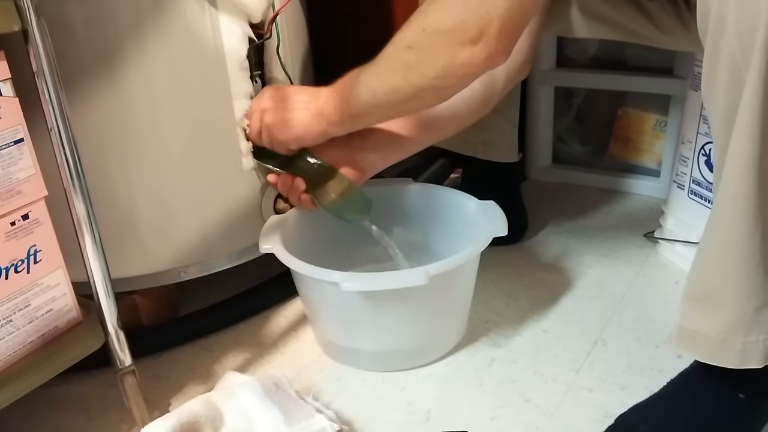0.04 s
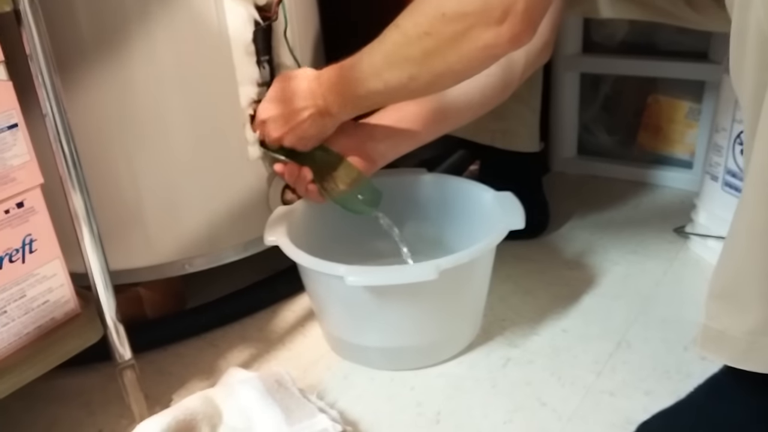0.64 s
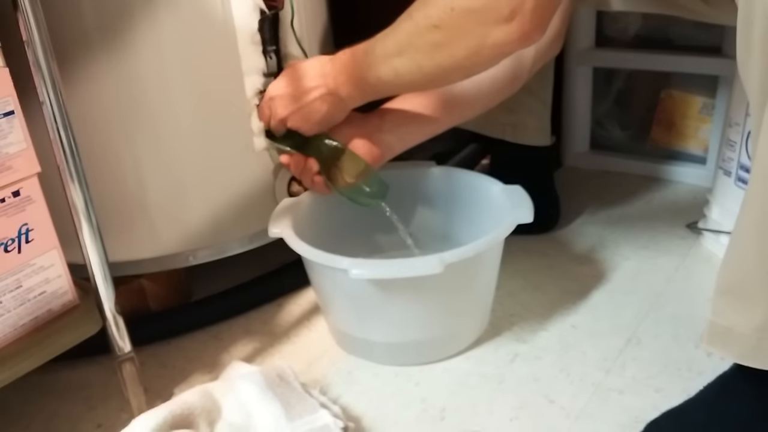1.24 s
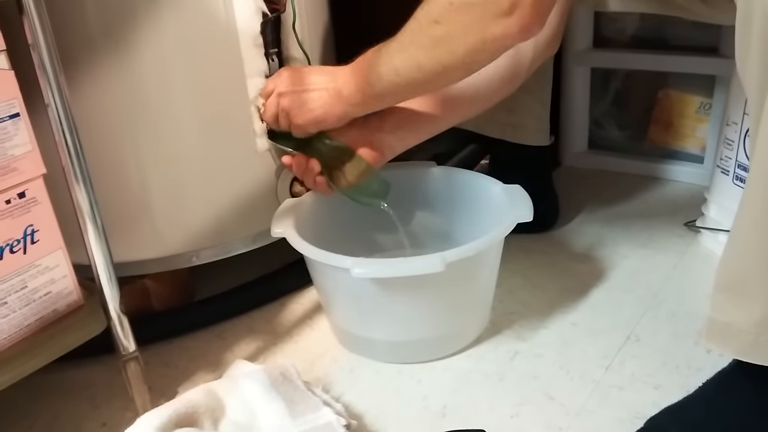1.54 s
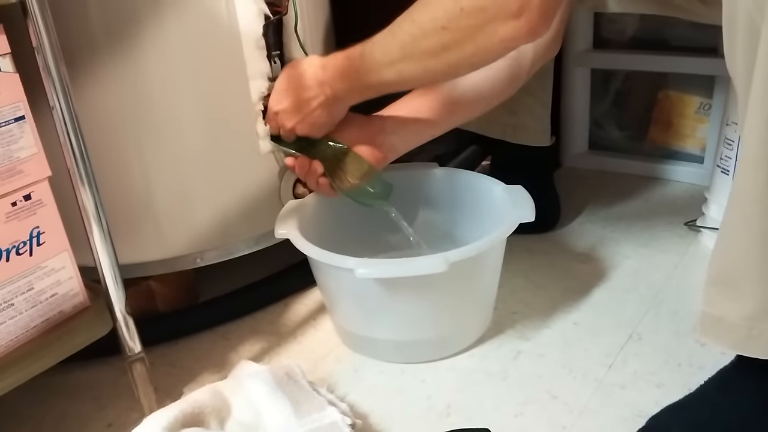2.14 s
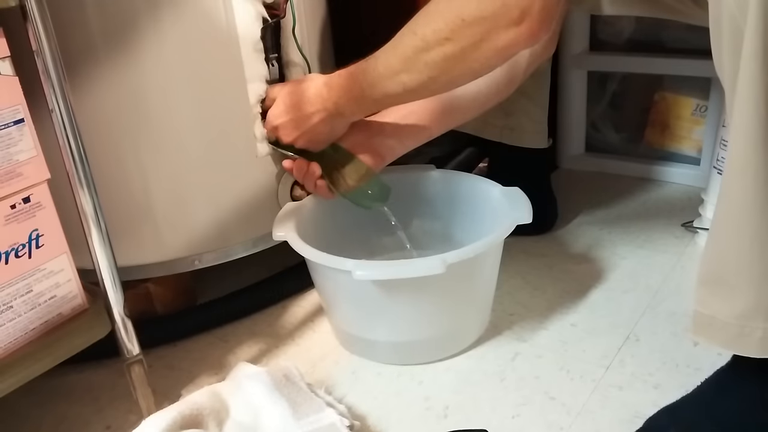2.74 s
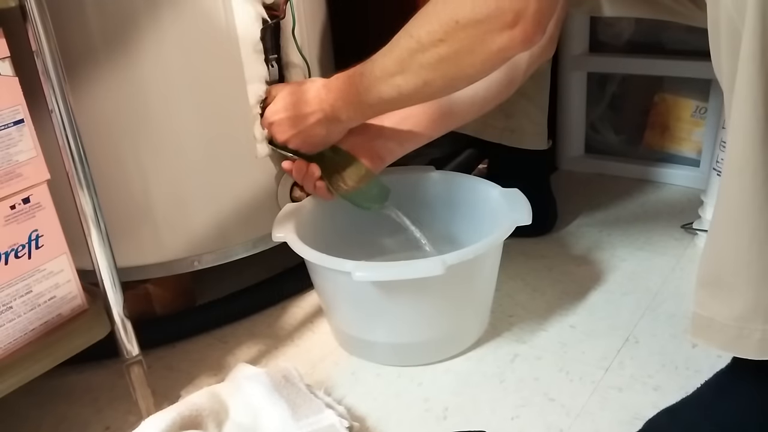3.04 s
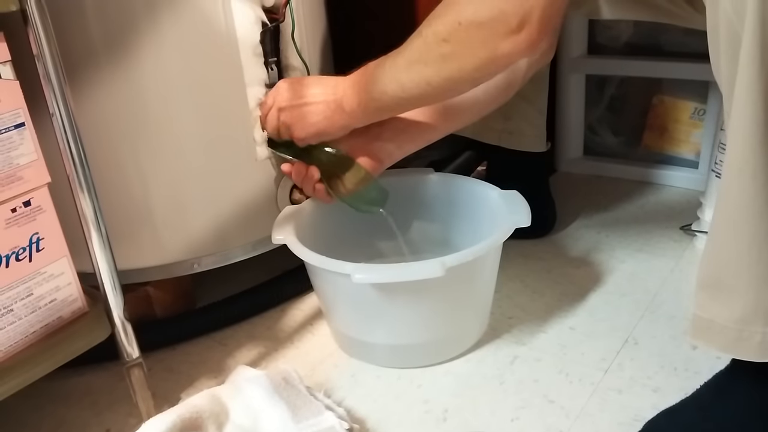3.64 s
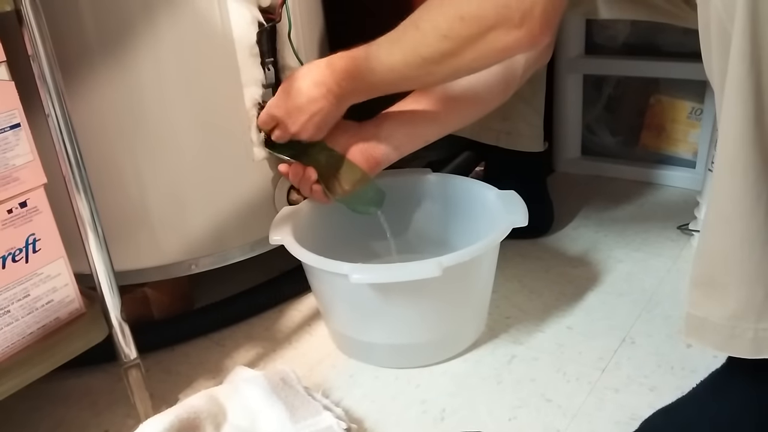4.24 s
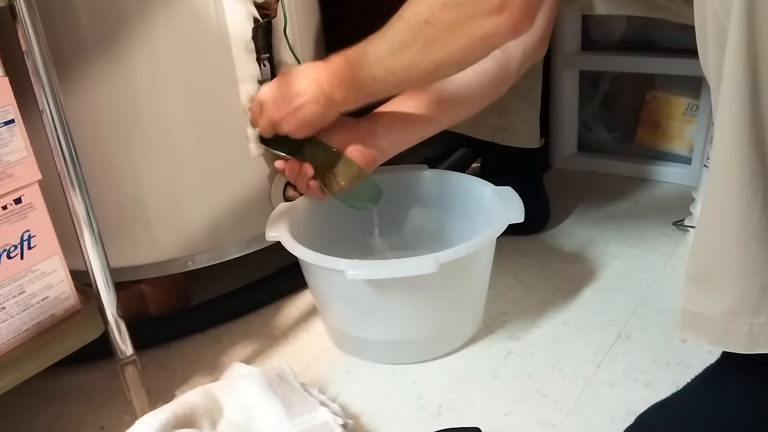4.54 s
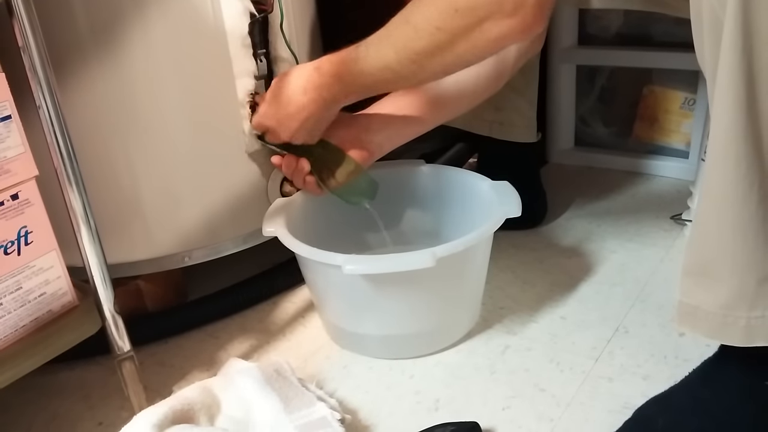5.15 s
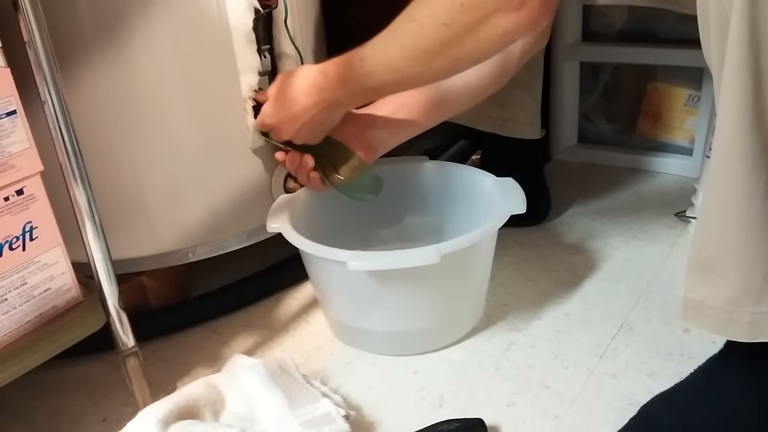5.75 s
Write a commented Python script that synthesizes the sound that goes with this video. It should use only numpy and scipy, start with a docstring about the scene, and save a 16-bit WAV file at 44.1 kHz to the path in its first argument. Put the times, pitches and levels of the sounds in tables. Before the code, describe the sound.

A thin, sputtering stream of water drains from a tank into a plastic bucket, splashing in the shallow water with bubbly plinks and small droplet ticks on the sides. The tank gulps air in hollow glugs at the start, twice in the middle and in a longer run near the end. A faint motor hum and low rumble continue underneath. The sound is fairly close, in a small room.

```python
"""Hollow glugs and a thin, sputtering stream: hot water drains from a heater tank down a plastic
chute into a plastic bucket. The jet slaps and churns the shallow water, drops splash, trapped bubbles
plink and droplets tick on the dry wall. Now and then the tank gulps air again and rings.
Underneath, a motor hums and rumbles in the small utility room."""
import sys
import numpy as np
from scipy import signal
from scipy.fft import rfft, irfft
from scipy.io import wavfile
from scipy.ndimage import uniform_filter1d

SR = 44100
rng = np.random.default_rng(int(sys.argv[2]) if len(sys.argv) > 2 else 0)


def inscribe(sig):
    """Save sig as 16-bit PCM at rate SR to the path in sys.argv[1].

    A 1-D sig is mono; a 2-D sig holds one channel per row.
    Samples are clipped to [-1, 1] before scaling.
    """
    pcm = np.round(np.clip(np.atleast_2d(sig).T, -1, 1) * 32767)
    wavfile.write(sys.argv[1], SR, pcm.astype(np.int16))


N = 264864
TIME_S = np.arange(N) / SR
AGE_S = TIME_S[:SR // 8]   # time within one event


def from_db(db):
    """Decibels to gain."""
    return 10 ** (np.asarray(db) / 20)


def rms_one(x):
    """Scale to rms 1."""
    return x / np.sqrt(np.mean(x ** 2) + 1e-20)


def peak_one(x):
    """Scale a stereo event to rms 1 over its loudest 4 ms."""
    return x / np.sqrt(uniform_filter1d(np.mean(x ** 2, axis=0), size=176).max() + 1e-20)


def levelled(x, size):
    """Hold stereo rms at 1 over a sliding window of size samples."""
    return x / np.sqrt(uniform_filter1d(np.mean(x ** 2, axis=0), size=size) + 1e-12)


def at_hz(table, hz):
    """Interpolate a table on a log-frequency axis."""
    knots_hz, values = np.transpose(table)
    return np.interp(np.log(hz + 1e-9), np.log(knots_hz), values)


def at_time(table, time_s):
    """Interpolate each value column of a table in time."""
    knots_s, *columns = np.transpose(table)
    return [np.interp(time_s, knots_s, column) for column in columns]


def decay(t60_s, age_s=AGE_S):
    """Exponential fall, 60 dB in t60_s."""
    return from_db(-60 * age_s / t60_s)


def attack(tau_s, age_s=AGE_S):
    """Exponential rise to 1."""
    return 1 - np.exp(-age_s / tau_s)


def pan(left_right_db):
    """Left and right gains, mean 1."""
    gains = from_db(left_right_db * np.array([[1], [-1]]) / 2)
    return gains / gains.mean(axis=0)


def add(out, start_s, sound):
    """Mix in a stereo event."""
    start = max(int(start_s * SR), 0)
    out[:, start:start + sound.shape[-1]] += sound[:, :N - start]


def drift(rate_hz):
    """Piecewise-linear random curve, rms 1."""
    knots = rng.standard_normal(int(rate_hz * N / SR) + 2)
    return rms_one(np.interp(TIME_S * rate_hz, np.arange(len(knots)), knots))


def stereo_noise(correlation, size):
    """White noise with a given left-right correlation."""
    mid, side = rng.standard_normal((2, size))
    return np.sqrt((1 + correlation) / 2) * mid + np.sqrt((1 - correlation) / 2) * side * [[1], [-1]]


def bandpass(x, low_hz, high_hz):
    """Butterworth band-pass."""
    return signal.sosfilt(signal.butter(2, [low_hz, high_hz], "band", fs=SR, output="sos"), x)


def resonate(x, hz, width_hz):
    """Two-pole resonator, peak gain 1."""
    radius = np.exp(-np.pi * width_hz / SR)
    numerator = np.array([1, 0, -1]) * (1 - radius ** 2) / 2
    denominator = [1, -2 * radius * np.cos(2 * np.pi * hz / SR), radius ** 2]
    return signal.lfilter(numerator, denominator, x + 1e-18)


# Stereo balance: (frequency [Hz], left-right [dB])
BALANCE = [(60, -5.5), (200, -6.5), (370, -11), (700, 0.5), (1300, -5.5), (2400, -2), (4400, -5),
           (8000, -8.5), (11000, 2), (15000, -0.5)]


def coloured(x, spectrum, size=8192):
    """Minimum-phase filter following a spectrum and the stereo balance."""
    hz = np.arange(size // 2 + 1) * SR / size
    magnitude = from_db(at_hz(spectrum, hz)) * pan(at_hz(BALANCE, hz))
    cepstrum = irfft(np.log(magnitude))
    cepstrum[:, 1:size // 2] *= 2
    response = irfft(np.exp(rfft(cepstrum[:, :size // 2], size)))
    return signal.fftconvolve(x, response, axes=-1)[:, :x.shape[-1]]


# Room decay: (frequency [Hz], T60 [s])
ROOM_DECAY = [(300, 1), (550, 0.43), (1000, 0.3), (3000, 0.36), (7000, 0.06), (14000, 0.53)]


def room(x, wet_db, size=12000):
    """Direct sound plus a diffuse tail with one decay time per band."""
    age_s, tail = TIME_S[:size], 0
    edges_hz = np.geomspace(200, 16000, 8)
    for low_hz, high_hz in zip(edges_hz, edges_hz[1:]):
        band = bandpass(stereo_noise(0.035, size), low_hz, high_hz)
        tail = tail + band * decay(at_hz(ROOM_DECAY, np.sqrt(low_hz * high_hz)), age_s)
    tail = rms_one(tail * attack(0.0035, age_s)) / np.sqrt(size)
    return x + from_db(wet_db) * signal.fftconvolve(x, tail, axes=-1)[:, :N]


# Room air: (frequency [Hz], level [dB])
AIR_SPECTRUM = [(100, -14), (330, 2.5), (560, -15), (900, 1), (2000, -31), (4000, -26), (7000, -19),
                (11000, -26), (16000, -31)]


def room_air(rms_db):
    """Faint, steady background noise."""
    return from_db(rms_db) * rms_one(coloured(stereo_noise(0.45, N), AIR_SPECTRUM))


# Hum lines: (frequency [Hz])
HUM_LINES_HZ = [59.4, 120.1, 175.0, 295.0, 350.6]
# Per hum line: (level [dB], left-right [dB])
HUM_LEVELS = [(-52, 5), (-38.5, -7), (-50.5, -4.5), (-64.5, -10), (-54.5, -10)]
# Rumble envelope: (time [s], level [dB])
RUMBLE_ENVELOPE = [(0.0, -46), (0.24, -35.5), (0.6, -33), (0.78, -45), (1.0, -28.5), (1.3, -34),
                   (1.47, -29), (1.77, -39), (1.96, -25), (2.06, -33.5), (2.3, -41.5), (2.42, -35.5),
                   (2.62, -39.5), (2.8, -34.5), (3.15, -39), (3.35, -33.5), (3.55, -40.5), (3.8, -30.5),
                   (4.1, -29), (4.72, -42), (4.82, -33), (5.0, -42.5), (5.22, -33.5), (5.45, -38.5),
                   (6.01, -33)]
# Rumble: (frequency [Hz], level [dB])
RUMBLE_SPECTRUM = [(10, -37), (21, -23), (32, -34), (47, -13.5), (58, 6), (68, -4), (79, 7.5), (98, -16.5),
                   (130, -23.5), (300, -62), (4000, -110)]
# Drone: (frequency [Hz], level [dB])
DRONE_SPECTRUM = [(60, -33), (100, -9), (122, -9), (140, -8), (172, -7.5), (195, -18.5), (245, -27),
                  (340, -22.5), (560, -36), (1200, -74.5), (4000, -110)]


def motor(rumble_db, drone_db, waver_db=1.4, hum_db_per_db=0.29, drone_db_per_db=0.56):
    """Near-steady hum lines and a rough drone, both swelling a little with a heaving rumble."""
    hum = 0
    for hz, (db, side_db) in zip(HUM_LINES_HZ, HUM_LEVELS):
        cycles = hz * TIME_S + rng.random() + 0.05 * drift(rate_hz=6)
        amplitude = np.sqrt(2) * from_db(db + waver_db * drift(rate_hz=8))
        hum = hum + pan(side_db) * amplitude * np.sin(2 * np.pi * cycles)
    level_db, = at_time(RUMBLE_ENVELOPE, TIME_S)
    heave_db = level_db - level_db.mean()
    rumble = levelled(coloured(stereo_noise(1.0, N), RUMBLE_SPECTRUM), size=5000)
    drone = levelled(coloured(stereo_noise(0.99, N), DRONE_SPECTRUM), size=9000)
    return (from_db(hum_db_per_db * heave_db) * hum
            + from_db(drone_db + drone_db_per_db * heave_db) * drone
            + from_db(level_db + rumble_db) * rumble)


def wall_echoes(sound, echo_db, t60_s, count=16):
    """Random reflections between container walls, different in each channel; output rms 1."""
    paths = np.zeros((2, SR // 32))
    for path in paths:
        lags = rng.integers(SR // 2500, SR // 40, count)
        path[lags] = from_db(echo_db) * rng.choice([-1, 1], count) * decay(t60_s)[lags]
        path[rng.integers(0, 12)] = 1   # direct path
    echoed = signal.fftconvolve(paths, np.atleast_2d(sound), axes=-1)
    return echoed / echoed.std(axis=-1, keepdims=True)


def bubble(age_s, hz, t60_cycles, swell_cycles, rise):
    """A bubble swells, rings down and rises in pitch as it nears the surface."""
    cycles = np.maximum(age_s, 0) * hz
    phase = 2 * np.pi * cycles * (1 + rise * (cycles / t60_cycles / 2 - 0.25))
    swell = (1 - np.exp(-cycles / swell_cycles)) ** 2
    return np.sin(phase) * from_db(-60 * cycles / t60_cycles) * swell


def bubble_cluster(hz, t60_cycles, swell_cycles, small_db, scatter_oct, delay_s, count=4, size=2200):
    """One main bubble, then a few weaker ones of nearby sizes."""
    lags_s = np.append(0, delay_s * rng.exponential(1, count))[:, None]
    pitches_hz = hz * np.append(1, 2 ** (scatter_oct * rng.uniform(-1.001, 1, count)))[:, None]
    gains = np.append(1, from_db(small_db) * rng.standard_normal(count))
    return gains @ bubble(AGE_S[:size] - lags_s, pitches_hz, t60_cycles, swell_cycles, rise=0.042)


# Air gulps: (time [s], level [dB], churn T60 [s], relative boom [dB], pitch [Hz], churn cutoff [Hz])
GULPS = [(0.002, -29.5, 0.047, -13, 1072, 1900), (0.044, -29, 0.04, -7, 806, 2100),
         (0.062, -18.5, 0.12, -29, 1017, 2630), (0.147, -23, 0.15, -7.5, 780, 2600),
         (1.549, -33, 0.15, -31, 737, 1690), (1.555, -24, 0.063, -31, 1340, 2210),
         (1.772, -31, 0.29, -13, 820, 1390), (2.086, -26.5, 0.11, -21, 1550, 2200),
         (2.091, -12.5, 0.099, -15.5, 1030, 3620), (2.099, -13, 0.1, -20, 924, 3050),
         (2.886, -36.5, 0.21, -9, 940, 1500), (2.929, -25.5, 0.097, -23, 753, 2200),
         (2.947, -19.5, 0.12, -35, 1310, 2620), (2.993, -14, 0.17, -10, 852, 2830),
         (3.048, -23.5, 0.22, -9.5, 977, 2580), (3.282, -28.5, 0.1, -5, 905, 2000),
         (4.529, -31.5, 0.047, -28, 1046, 1320), (4.61, -32.5, 0.13, -8, 990, 1390),
         (4.664, -30.5, 0.093, -12, 1330, 1600), (4.743, -32.5, 0.15, -14, 1100, 1500),
         (4.793, -25, 0.18, -14, 1556, 1890), (4.822, -17.5, 0.19, -17, 985, 1670),
         (4.85, -25, 0.065, -16, 1305, 1590), (5.385, -30.5, 0.18, -18, 1430, 2000),
         (5.393, -22, 0.19, -12.5, 762, 2320), (5.473, -30.5, 0.16, -5.5, 910, 1600),
         (5.526, -25.5, 0.17, -12.5, 1320, 1670), (5.562, -22, 0.1, -18, 920, 1870),
         (5.594, -29.5, 0.07, -22, 990, 1680), (5.641, -35.5, 0.091, -22, 780, 1500),
         (5.687, -30.5, 0.067, -30, 1195, 1700)]
# Churn in the tank: (frequency [Hz], level [dB])
CHURN_SPECTRUM = [(200, -28.5), (370, -13), (560, -23.5), (660, -6.5), (740, 1.5), (950, 2.5), (1400, -6),
                  (2100, -10), (2800, -13.5), (3600, -24), (8000, -19), (16000, -87)]
# Tank resonances: (frequency [Hz], width [Hz], gain [dB])
TANK_MODES = [(353, 37, 10.5), (726, 48, 3), (900, 15, -2), (1180, 43, 7), (1462, 55, 14), (2160, 14, -7)]


def glugs(gain_db, tank_db, lumps_db, gulp_db, swell_s, pocket_hz=354, pocket_width_hz=177, size=13000):
    """Air breaks in as a big bubble with a lumpy churn; the air pocket booms, the tank rings hollow."""
    water, pocket = np.zeros((2, 2, N))
    age_s = TIME_S[:size]
    for time_s, db, t60_s, boom_db, hz, cutoff_hz in GULPS:
        gain = from_db(db + gain_db)
        rise_s = swell_s * from_db(-0.9 * (db + 15))   # weak gulps build more slowly
        lumps = from_db(lumps_db * rng.standard_normal(size // 64 + 1)).repeat(64)[:size]
        churn = stereo_noise(0.49, size) * lumps * attack(rise_s, age_s) ** 2
        settling = from_db(-22) * decay(0.37, age_s) * resonate(churn, hz=945, width_hz=200)
        churn = churn * decay(t60_s, age_s) + settling
        churn = signal.lfilter(*signal.butter(3, cutoff_hz, fs=SR), churn)
        add(water, time_s - rise_s, gain * peak_one(coloured(churn, CHURN_SPECTRUM, size=2048)))

        bubbles = bubble_cluster(hz, t60_cycles=25, swell_cycles=2.2, small_db=-16.5,
                                 scatter_oct=0.464, delay_s=0.008)
        gulp = peak_one(wall_echoes(bubbles, echo_db=-7, t60_s=0.047))
        add(water, time_s, gain * from_db(gulp_db) * gulp)

        boom = stereo_noise(0.95, size) * decay(0.39, age_s)
        for _ in range(2):
            boom = resonate(boom, pocket_hz, pocket_width_hz)
        add(pocket, time_s, pan(-8) * gain * from_db(boom_db) * peak_one(boom))
    ring = sum(from_db(db) * resonate(water, hz, width_hz) for hz, width_hz, db in TANK_MODES)
    return water + pocket + from_db(tank_db) * ring


# Droplets on the bucket's dry wall: (time [s], level [dB])
WALL_HITS = [(0.0688, -48.5), (0.102, -48), (0.145, -36), (0.2973, -44), (0.425, -42), (0.633, -49.5),
             (0.786, -41.5), (0.8276, -42), (0.962, -45), (1.029, -44.5), (1.063, -46), (1.1139, -40.5),
             (1.156, -45), (1.283, -49), (1.6978, -39), (1.872, -44), (1.9, -44), (2.022, -42),
             (2.221, -50), (2.403, -42), (2.4519, -42), (2.626, -53), (2.71, -39), (2.899, -40),
             (3.105, -39), (3.146, -40), (3.195, -48), (3.221, -44), (3.239, -45), (3.265, -36),
             (3.2898, -31.5), (3.5313, -34.5), (3.632, -47), (3.6721, -40), (3.977, -45), (4.089, -42),
             (4.3717, -33.5), (4.4783, -42.5), (4.6035, -38), (4.6963, -43), (4.7926, -41), (4.9886, -44),
             (5.0145, -35.5), (5.039, -39.5), (5.307, -44)]
# Tick: (frequency [Hz], level [dB])
TICK_SPECTRUM = [(1000, -9), (2500, -19), (6000, 9.5), (9000, 11), (12000, 1), (16000, -2)]


def ticks(gain_db, t60_s, mist_db, side_db):
    """A droplet on dry plastic gives a bright smack and a wisp of mist."""
    out = np.zeros((2, N))
    envelope = (decay(t60_s) + from_db(mist_db) * decay(0.083)) * attack(0.001)
    for time_s, db in WALL_HITS:
        smack = coloured(stereo_noise(0.1, len(AGE_S)) * envelope, TICK_SPECTRUM, size=256)
        add(out, time_s, pan(side_db) * from_db(db + gain_db) * peak_one(smack))
    return out


# Large bubbles trapped by the stream: (time [s], level [dB], pitch [Hz], left-right [dB])
LARGE_BUBBLES = [(0.328, -20, 1427, 0), (0.366, -28.5, 1087, 0), (0.38, -27.5, 1506, -2),
                 (0.565, -32.5, 992, -1), (0.69, -30, 1642, -3), (0.817, -35, 1555, 0),
                 (0.854, -34, 1230, 6), (0.922, -32, 1406, 0), (0.963, -24.5, 1541, 2),
                 (0.974, -32, 1070, 0), (1.037, -35, 1430, 0), (1.06, -28.5, 1008, -2),
                 (1.064, -29, 2060, 3), (1.184, -35, 2220, 7), (1.212, -32.5, 1580, 6),
                 (1.226, -39, 1527, -4), (1.602, -28, 1218, -3), (1.604, -28.5, 1950, 0),
                 (1.631, -34, 1480, -1), (1.777, -18, 875, 1), (2.022, -27.5, 2520, 0),
                 (2.24, -35, 1450, 4), (2.297, -34.5, 1620, 0), (2.336, -33, 1470, -2),
                 (2.36, -27, 1713, -5), (2.403, -29, 1740, -4), (2.461, -29.5, 2087, 6),
                 (2.485, -33, 1570, -4), (2.511, -42, 1430, -9), (2.594, -27, 2300, 1),
                 (2.628, -29.5, 1344, -5), (2.643, -24, 1546, 0), (2.674, -30.5, 1482, -4),
                 (3.15, -33.5, 1890, 13), (3.411, -27, 2300, 4), (3.275, -26.5, 2360, 2),
                 (3.351, -27.5, 2340, 0), (3.367, -23.5, 1630, 0), (3.449, -25.5, 1780, -3),
                 (3.49, -35, 1303, -9), (3.536, -24.5, 934, -0.5), (3.6, -34, 990, -2),
                 (3.959, -34, 1970, 6), (4.085, -31.5, 1400, -6), (4.129, -30, 1944, 3.5),
                 (4.309, -22, 1930, -4.5), (4.375, -28, 1915, 0), (4.408, -23.5, 1970, -2),
                 (4.525, -28, 1003, 1), (4.632, -39, 1160, -8), (4.666, -27, 1337, -11),
                 (4.795, -17.5, 1593, -4), (5.199, -28.5, 2830, -4), (5.253, -24, 1937, 5),
                 (5.803, -38.5, 1910, 3)]


def plinks(gain_db, slosh_db, lead_s, calm_db=-52, slosh_db_per_db=0.34):
    """Large bubbles ring lower and longer: clean in calm water, blurred by slosh as the stream churns."""
    out = np.zeros((2, N))
    for time_s, db, hz, side_db in LARGE_BUBBLES:
        bubbles = bubble_cluster(hz, t60_cycles=59, swell_cycles=1.9, small_db=-17.5,
                                 scatter_oct=0.345, delay_s=0.004)
        ring = peak_one(wall_echoes(bubbles, echo_db=-4.5, t60_s=0.025))
        burst = stereo_noise(0.32, len(AGE_S)) * decay(0.038) * AGE_S
        slosh = peak_one(resonate(burst, hz, width_hz=0.12 * hz))
        burble_db, _ = at_time(STREAM_ENVELOPE, time_s)
        slosh *= from_db(slosh_db + slosh_db_per_db * (burble_db - calm_db))
        for sound in (ring, slosh):
            add(out, time_s - lead_s, pan(side_db) * from_db(db + gain_db) * sound)
    return out


# Drops in the bucket: (time [s], ring level [dB], pitch [Hz], splash level [dB], ring left-right [dB])
DROP_HITS = [(0.1461, -25.5, 2770, -30.5, 4), (0.164, -43, 4160, -30.5, -10), (0.231, -33, 6600, -47, -16),
             (0.4268, -23, 4290, -34, -12), (0.434, -25, 4800, -32, 0), (0.5146, -26, 6470, -41, -11),
             (0.5937, -28, 5330, -51, 4), (0.624, -35, 4900, -60, 1), (0.7099, -30.5, 6370, -33, -20),
             (0.829, -24, 7700, -51, -9), (0.854, -27.5, 6970, -61, -11), (0.918, -14.5, 6790, -41, -17),
             (0.918, -20.5, 4760, -52, -4), (0.961, -31, 5530, -36, -4), (0.975, -28.5, 6800, -50, -17),
             (1.019, -37, 4840, -47, -8), (1.0593, -23, 6600, -47, -11), (1.1154, -20.5, 4110, -36.5, -4),
             (1.228, -28.5, 4680, -62, 0), (1.285, -32, 3520, -48, -13), (1.5553, -25.5, 5720, -33.5, -7),
             (1.6046, -26, 3050, -31, -4), (1.6467, -28.5, 4380, -41, -13), (1.699, -30.5, 4420, -40, -10),
             (1.8731, -23.5, 6230, -47, -13), (1.901, -42, 5660, -50, -10), (1.953, -32, 4200, -52, -8),
             (1.991, -33, 4120, -58, -8), (2.1944, -27, 3550, -34, -9), (2.329, -35.5, 7040, -61, -17),
             (2.402, -28.5, 6700, -55, -17), (2.463, -30.5, 5860, -48, -8), (2.4775, -22.5, 6600, -38, -13),
             (2.578, -32, 3170, -44, -13), (2.639, -29.5, 3300, -49, -11), (2.677, -19, 5750, -31, -18),
             (2.711, -27, 5840, -35.5, -16), (2.78, -24.5, 6400, -41, -12), (2.884, -37, 5200, -44, 0),
             (3.1064, -31.5, 6300, -53, -4), (3.144, -23.5, 7700, -36, -8), (3.239, -31.5, 6560, -41, -9),
             (3.2634, -33, 6800, -38, -11), (3.344, -28, 7040, -37.5, -13), (3.448, -31, 7150, -40, -12),
             (3.5328, -17.5, 6310, -36, -7), (3.671, -24.5, 6530, -37, -8), (3.749, -23, 3440, -53, -7),
             (4.013, -33.5, 6400, -44.5, -10), (4.088, -38, 4000, -44, -8), (4.13, -32.5, 6200, -50, -19),
             (4.217, -32.5, 4670, -74, -3), (4.2682, -27.5, 4500, -37, -4), (4.357, -18, 5420, -44, 1),
             (4.362, -23, 4960, -40, -11), (4.372, -14, 6300, -27.5, -10), (4.518, -29, 5850, -41, -12),
             (4.6049, -26.5, 2700, -38.5, 1.5), (4.631, -38, 5630, -45, -7), (4.6968, -28, 7900, -47, -9),
             (4.7384, -21.5, 5930, -26, -5), (4.7942, -27, 7020, -34, -19), (4.807, -29.5, 3290, -40, -8),
             (5.016, -18, 4850, -42, -8.5), (5.038, -34, 2940, -53, -2), (5.0812, -32, 6300, -34.5, -16),
             (5.2549, -25.5, 6500, -28, -1), (5.621, -29, 6650, -63, -11)]
# Splash: (frequency [Hz], level [dB])
SPLASH_SPECTRUM = [(600, 4.5), (1500, -1), (2800, 9.5), (4200, 23.5), (6800, 12.5), (8500, 11.5),
                   (10500, -10.5), (13000, -20), (16000, -18)]


def drops(ring_gain_db, splash_gain_db, splash_t60_s, lead_s):
    """A drop slaps the water and pinches off tiny ringing bubbles."""
    out = np.zeros((2, N))
    envelope = (decay(splash_t60_s) + from_db(-42) * decay(0.056)) * attack(0.0012)
    for time_s, ring_db, hz, splash_db, side_db in DROP_HITS:
        bubbles = bubble_cluster(hz, t60_cycles=34, swell_cycles=1.75, small_db=-13.5,
                                 scatter_oct=0.507, delay_s=0.0014)
        ring = peak_one(wall_echoes(bubbles, echo_db=1.5, t60_s=0.041))
        slap = stereo_noise(0.062, len(AGE_S)) * envelope
        splash = peak_one(coloured(slap, SPLASH_SPECTRUM, size=256))
        add(out, time_s - lead_s, pan(side_db) * from_db(ring_db + ring_gain_db) * ring)
        add(out, time_s - lead_s, from_db(splash_db + splash_gain_db) * splash)
    return out


def bubble_swarm(spectrum, per_s, t60_cycles, spread_db, size):
    """Small bubbles of random pitch, strength and position, filling a spectrum."""
    starts = np.flatnonzero(rng.random(N - size) < per_s / SR)
    pitch, strength, position = rng.random((len(starts), 3)).T
    low_hz, high_hz = spectrum[0][0], spectrum[-1][0]
    hz = low_hz * (high_hz / low_hz) ** pitch
    strength_db = spread_db * np.minimum(-np.log(1 - strength), 3)
    gains = hz * from_db(at_hz(spectrum, hz) + strength_db)   # hz offsets the short, broad high rings
    stereo_gains = gains * pan(at_hz(BALANCE, hz) + 10 * (position - 0.5))
    rings = bubble(AGE_S[:size], hz[:, None], t60_cycles, swell_cycles=3.9, rise=0.032)
    samples = (starts[:, None] + np.arange(size)).ravel()
    return np.array([np.bincount(samples, (gain[:, None] * rings).ravel(), N) for gain in stereo_gains])


# Slap band edges: (frequency [Hz])
SLAP_EDGES_HZ = [300, 1300, 2600, 5200, 9500, 17000]


def patter(spectrum, per_s, t60_s, spread_db=4.5, band_spread_db=5):
    """The broken jet hits the water in short slaps, each with its own strength and colour."""
    starts = np.flatnonzero(rng.random(N) < per_s / SR)
    strength_db = spread_db * np.minimum(rng.exponential(1, N)[starts], 3)
    slap_power = (decay(t60_s) * attack(0.0015)) ** 2
    out = 0
    for low_hz, high_hz in zip(SLAP_EDGES_HZ, SLAP_EDGES_HZ[1:]):
        gains = from_db(strength_db + band_spread_db * rng.uniform(-1.4, 1, N)[starts])
        power = signal.fftconvolve(np.bincount(starts, gains ** 2, N), slap_power)[:N]
        out = out + bandpass(stereo_noise(0.067, N) * np.sqrt(np.abs(power)), low_hz, high_hz)
    return levelled(coloured(out, spectrum, size=512), size=9000)


# Stream strength: (time [s], burble level [dB], spray level [dB])
STREAM_ENVELOPE = [(0.0, -39.5, -51), (0.25, -42.5, -49), (0.4, -42.5, -44), (0.7, -48, -54),
                   (1.0, -42.5, -53.5), (1.4, -48, -47.5), (1.52, -53.5, -55.5), (2.02, -52.5, -50),
                   (2.29, -38.5, -47.5), (2.62, -46, -47.5), (2.77, -48, -46.5), (2.94, -55.5, -49),
                   (3.12, -54, -54), (3.27, -47.5, -47.5), (3.48, -44.5, -47.5), (3.9, -51, -54),
                   (4.47, -56.5, -53.5), (4.75, -45.5, -59.5), (5.17, -55.5, -48), (5.4, -79, -57),
                   (5.57, -47.5, -64), (5.82, -60, -61), (6.01, -69, -64)]
# Burbling bubbles: (frequency [Hz], level [dB])
BURBLE_SPECTRUM = [(300, -2), (400, 4), (570, -16.5), (780, 3), (1000, 6), (1500, 0), (2200, -4.5),
                   (3000, -13), (4500, -35)]
# Jet slapping the pool: (frequency [Hz], level [dB])
SLOP_SPECTRUM = [(300, -13), (570, -19), (800, 3), (1500, 1), (2300, -1.5), (3200, -10.5), (6000, -21),
                 (16000, -54)]
# Fizzing bubbles: (frequency [Hz], level [dB])
FIZZ_SPECTRUM = [(1500, -6), (2500, -4), (4000, 10.5), (5300, -7.5), (6800, 12), (8500, 3), (10500, -10),
                 (15500, -20)]
# Splatter: (frequency [Hz], level [dB])
SPLATTER_SPECTRUM = [(500, -17), (900, 11), (1600, -9), (2600, 2.5), (4200, 5), (6800, 11.5), (9000, 5),
                     (12000, -6), (16000, -7)]


def stream(burble_gain_db, slop_db, fizz_db, splatter_db, sputter_db, surge_db):
    """The jet slaps and churns the water and throws up fizz and splatter, all in spurts."""
    burble = bubble_swarm(BURBLE_SPECTRUM, per_s=330, t60_cycles=21, spread_db=4, size=1200)
    burble = wall_echoes(burble, echo_db=-8, t60_s=0.08)[:, :N]
    slop = patter(SLOP_SPECTRUM, per_s=190, t60_s=0.049)
    churn = from_db(burble_gain_db) * burble * pan(-2) + from_db(slop_db) * slop

    fizz = bubble_swarm(FIZZ_SPECTRUM, per_s=600, t60_cycles=23, spread_db=7.5, size=600)
    fizz = wall_echoes(fizz, echo_db=0.5, t60_s=0.028)[:, :N]
    splatter = patter(SPLATTER_SPECTRUM, per_s=190, t60_s=0.055)
    spray = from_db(fizz_db) * fizz * pan(-11.5) + from_db(splatter_db) * splatter * pan(-1.2)

    spurts = from_db(sputter_db * drift(rate_hz=45) + surge_db * drift(rate_hz=14))
    burble_db, spray_db = at_time(STREAM_ENVELOPE, TIME_S)
    return spurts * (from_db(burble_db) * churn + from_db(spray_db) * spray)


def scene():
    """Bucket and tank in the room, over motor and air."""
    water = drops(ring_gain_db=-4.5, splash_gain_db=0.5, splash_t60_s=0.055, lead_s=0.00054)
    water += plinks(gain_db=-4.5, slosh_db=-7.5, lead_s=0.000943)
    water += stream(burble_gain_db=-2, slop_db=-7, fizz_db=-3.5, splatter_db=-3,
                    sputter_db=2.5, surge_db=1.5)
    water += ticks(gain_db=0.5, t60_s=0.024, mist_db=-22, side_db=-2.5)
    tank = glugs(gain_db=-8, tank_db=-6, lumps_db=3, gulp_db=-3.5, swell_s=0.0024)
    air = room_air(rms_db=-55)
    draining = room(water, wet_db=-12.5) + room(tank, wet_db=-13.5)
    return draining + motor(rumble_db=1, drone_db=-42.5) + air


def record(dry):
    """Steep elliptic low-pass."""
    cutoff_hz = 16200
    return signal.sosfilt(signal.ellip(10, 0.1, 80, cutoff_hz, fs=SR, output="sos"), dry)


dry = scene()
out = record(dry)
inscribe(out)
```